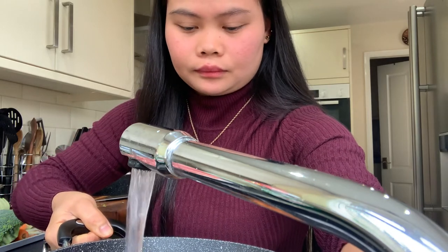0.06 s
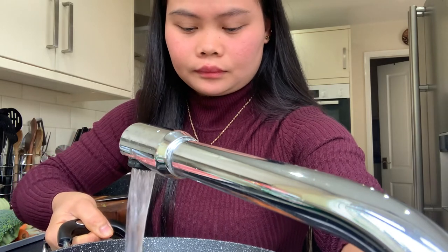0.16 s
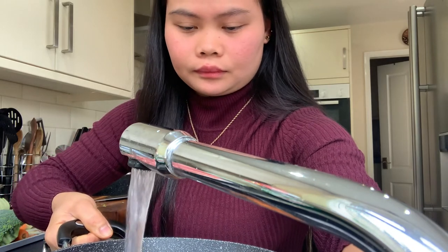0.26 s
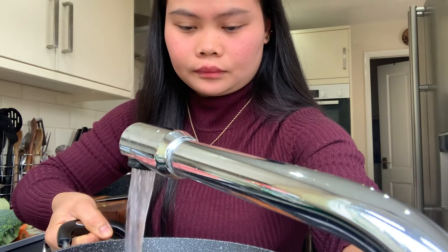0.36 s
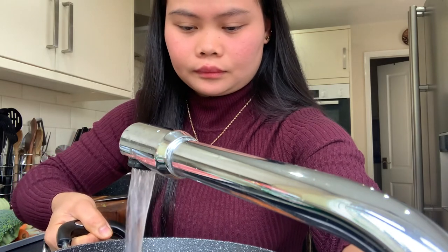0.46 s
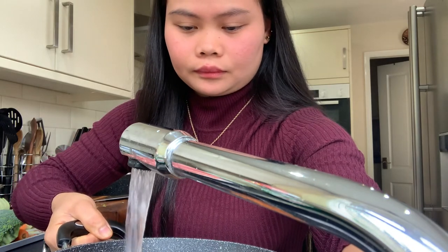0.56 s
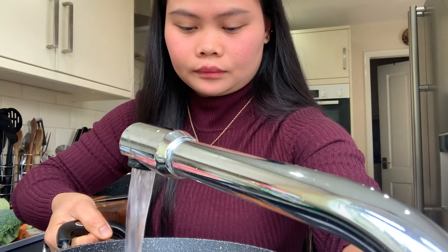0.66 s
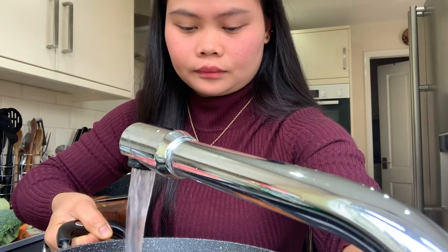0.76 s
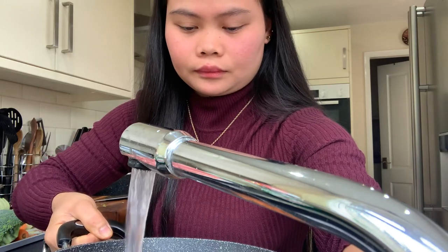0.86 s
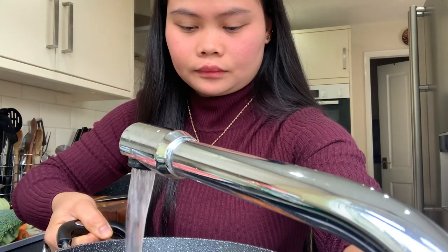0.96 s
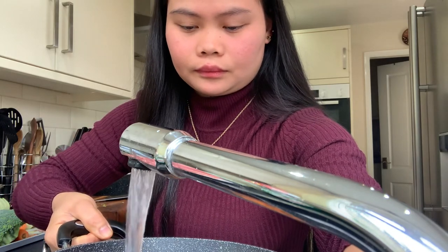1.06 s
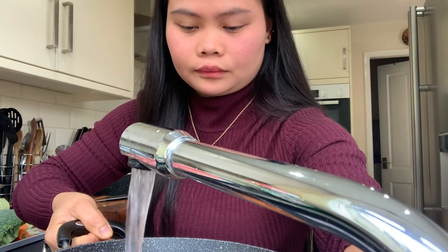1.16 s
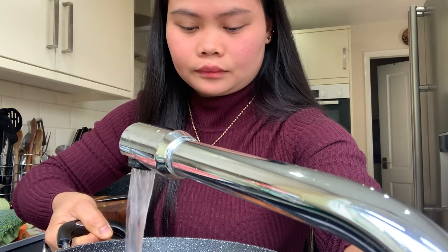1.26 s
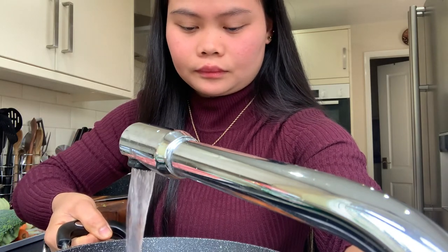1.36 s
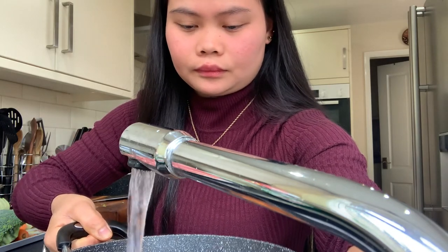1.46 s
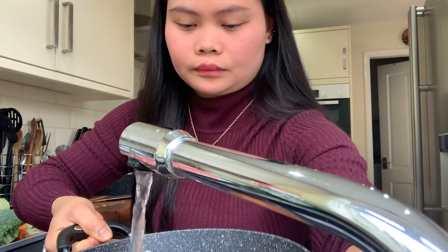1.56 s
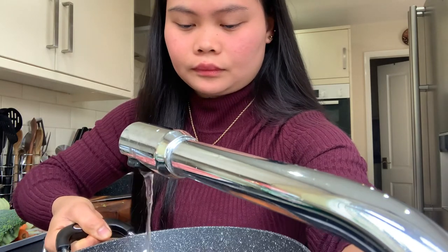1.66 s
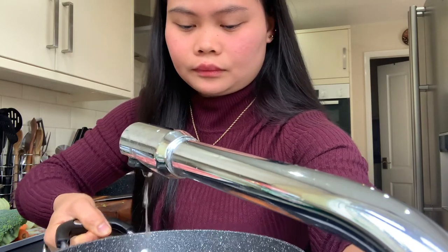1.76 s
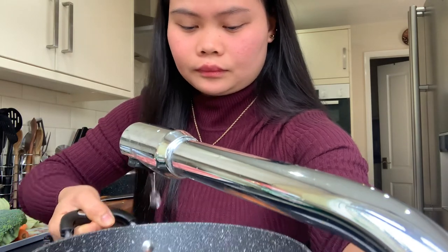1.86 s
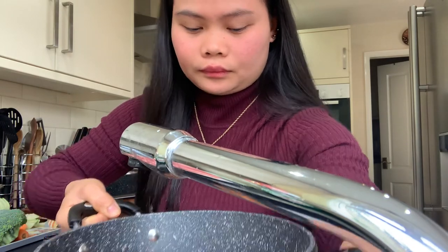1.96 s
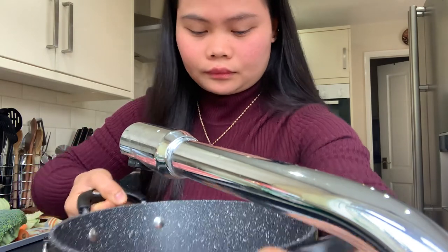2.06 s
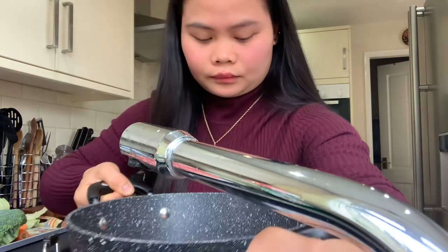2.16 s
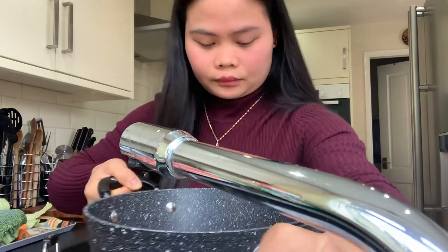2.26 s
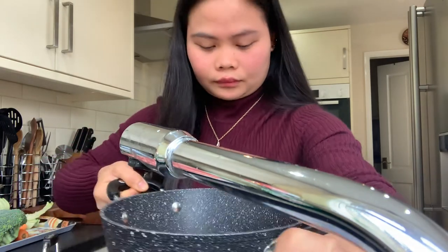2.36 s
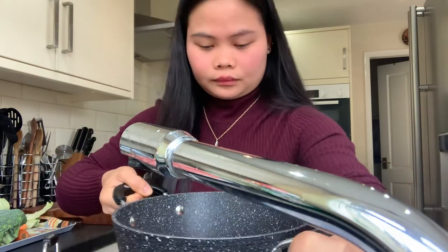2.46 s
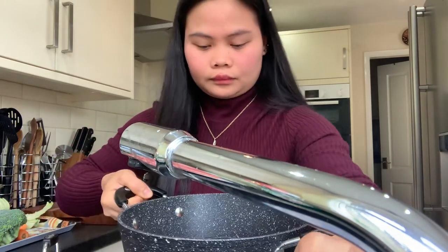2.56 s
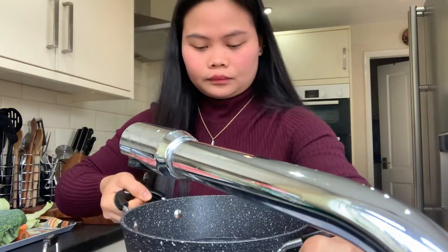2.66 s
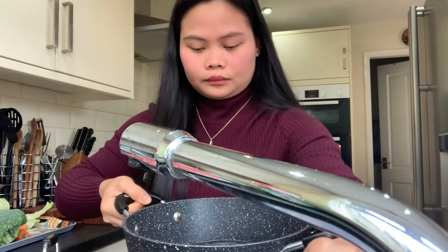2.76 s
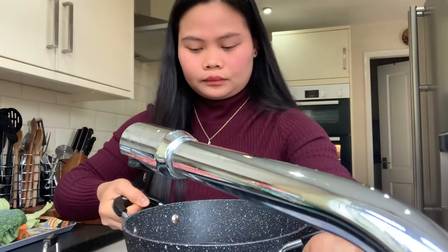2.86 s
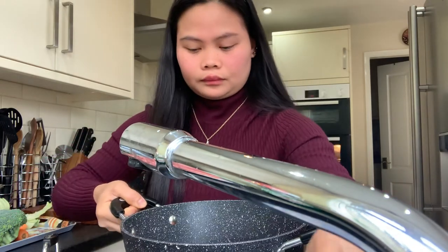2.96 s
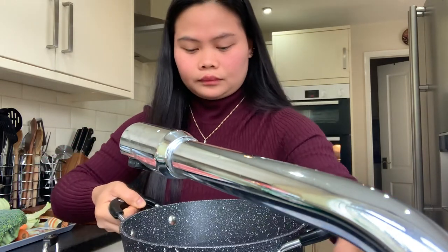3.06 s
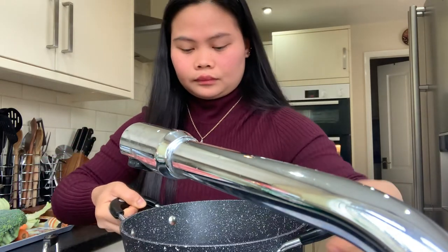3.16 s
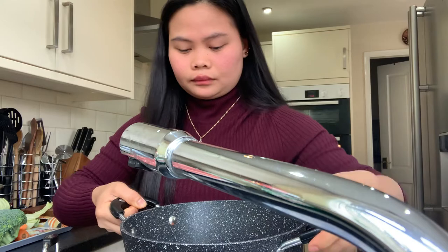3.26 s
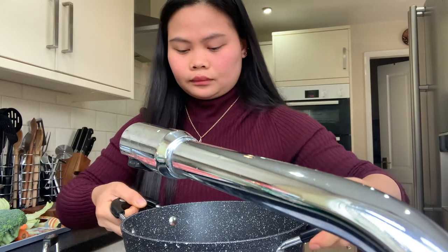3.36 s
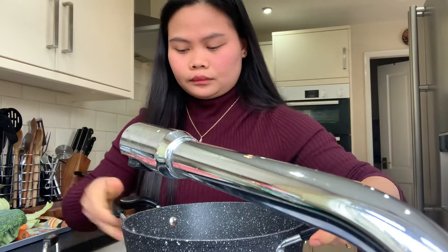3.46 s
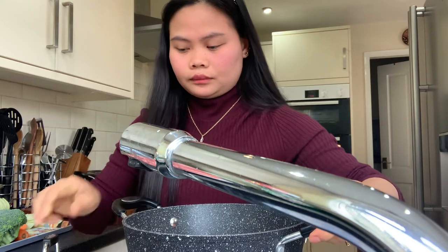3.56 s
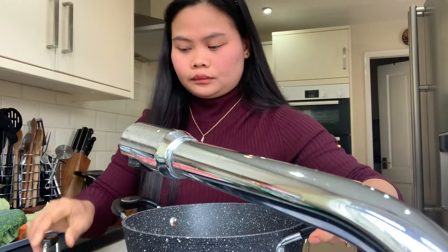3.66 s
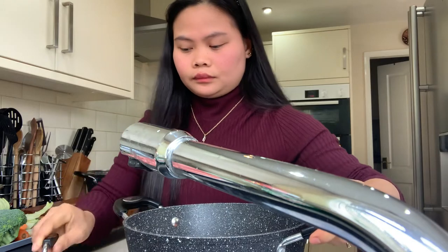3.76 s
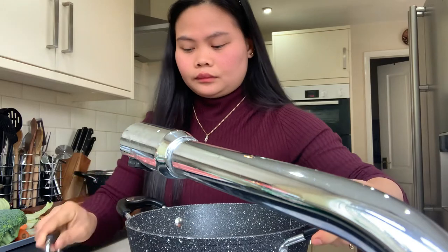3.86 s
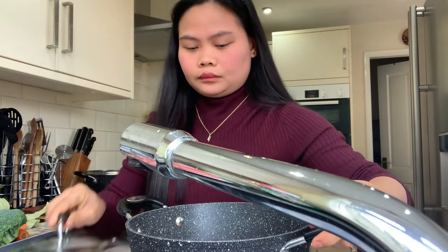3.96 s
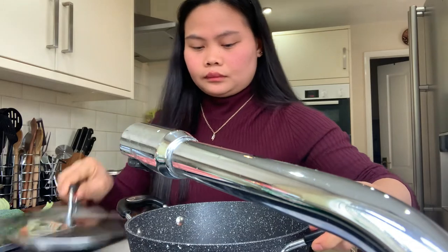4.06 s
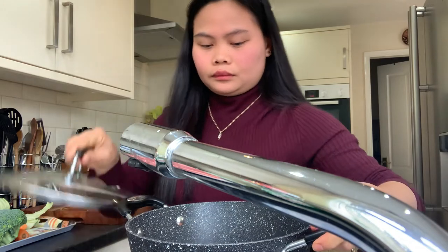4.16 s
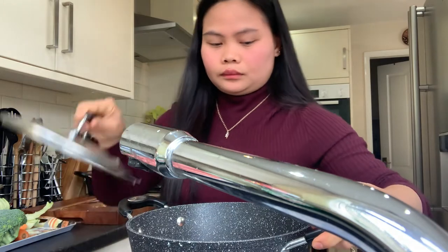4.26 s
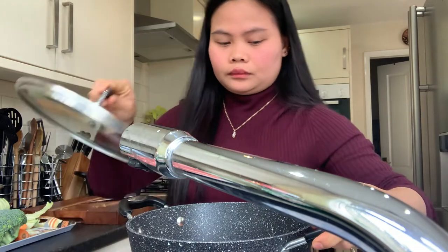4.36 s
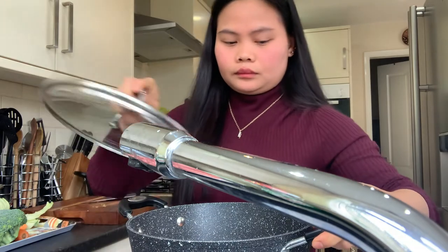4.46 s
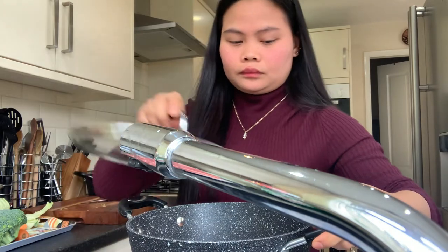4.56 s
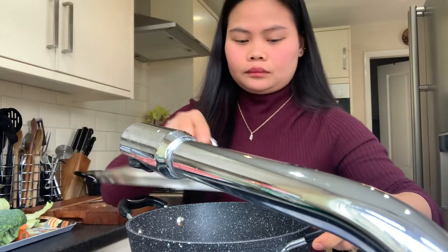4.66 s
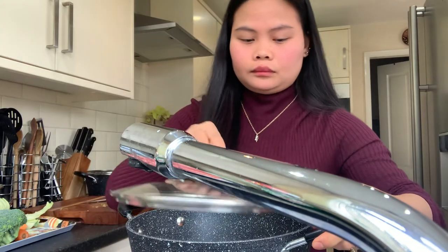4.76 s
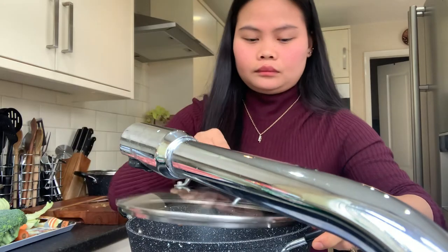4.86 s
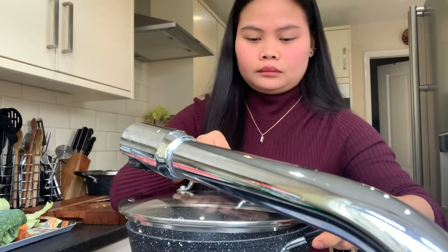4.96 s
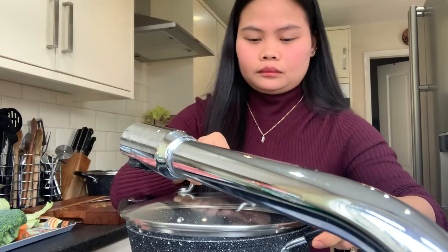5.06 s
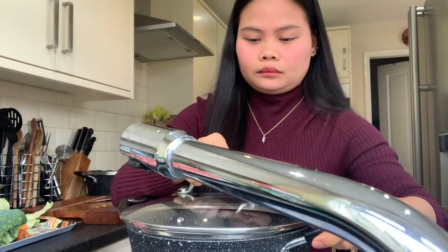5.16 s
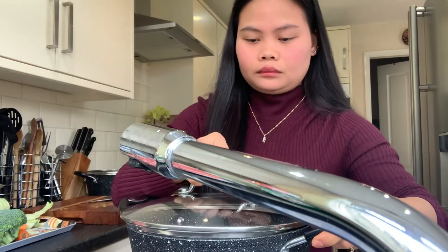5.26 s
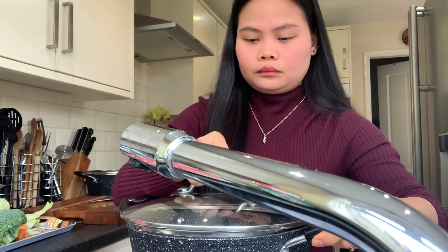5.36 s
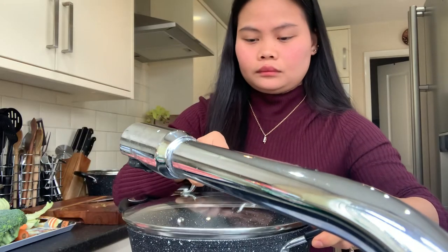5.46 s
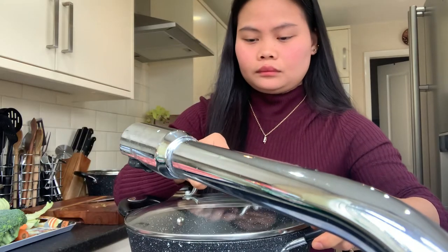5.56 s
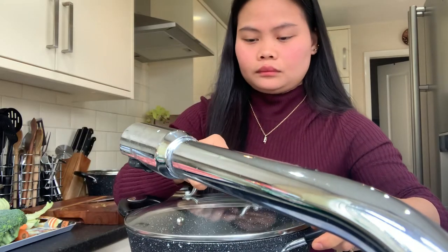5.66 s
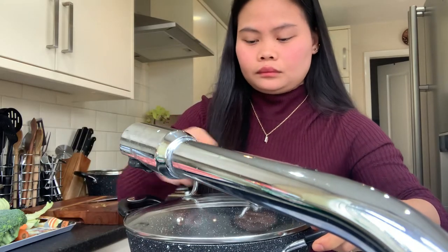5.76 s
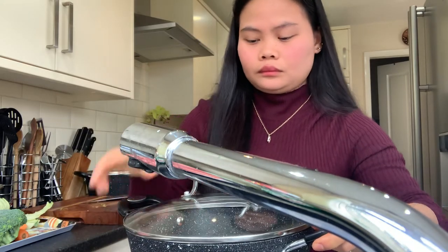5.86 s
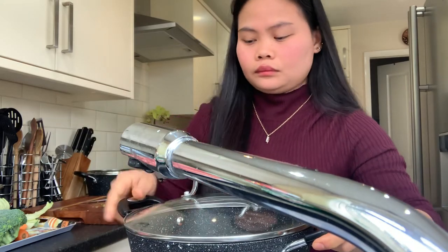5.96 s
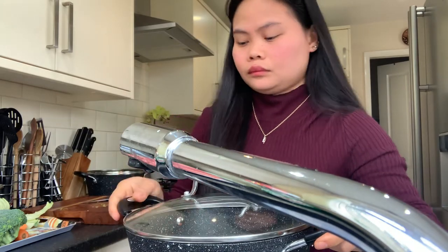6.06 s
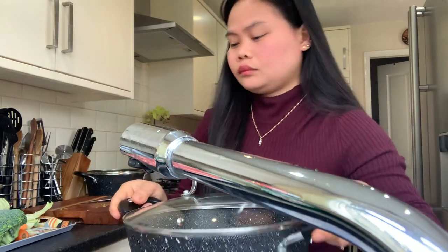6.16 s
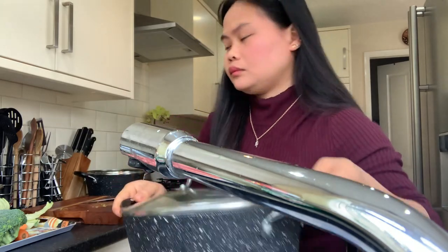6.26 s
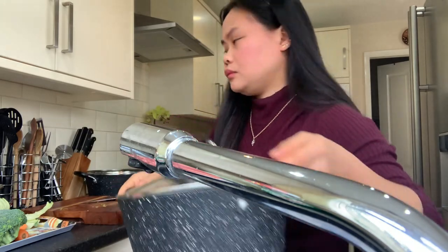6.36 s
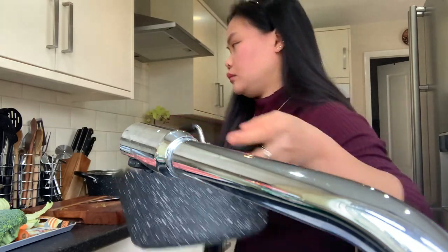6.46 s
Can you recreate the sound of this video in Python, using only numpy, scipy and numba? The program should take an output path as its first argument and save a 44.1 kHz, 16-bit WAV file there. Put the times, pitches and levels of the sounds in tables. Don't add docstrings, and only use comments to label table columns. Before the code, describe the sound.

Close in a tiled kitchen with a faint fridge hum, tap water hisses and bubbles hollowly into a metal pot. It shuts off quickly, leaving plops and drips. The pot thuds onto the worktop and settles, hands rustle softly, a glass lid scrapes and knocks sharply, then clanks onto the rim, slides into its seat, and the covered pot rattles as it is shifted. Stereo phone microphone, short reverberation.

```python
import sys
import numpy as np
from scipy import signal
from scipy.fft import rfft, irfft
from scipy.io import wavfile
from scipy.ndimage import uniform_filter1d
from numba import njit

SR = 44100
rng = np.random.default_rng(int(sys.argv[2]) if len(sys.argv) > 2 else 0)


def magnitude_from_level(level_db):
    exponent = np.asarray(level_db, float) / 20
    return 10 ** exponent


def dump_mix(stems):
    frames = np.atleast_2d(stems).T
    limited = np.clip(frames, -1, 1)
    pcm = np.round(limited * 32767).astype(np.int16)
    wavfile.write(sys.argv[1], SR, pcm)


N = 287527
PORTS = np.array([[1], [-1]])
SHUT_S = 1.516

# (frequency [Hz], density [dB per Hz])
LID_ON_POT_BODY = [(40, -33), (200, -2), (450, 7), (1050, -11.5), (1400, -11), (3000, -14), (6200, -28),
                   (9000, -39.5), (12000, -58), (16000, -62)]


def level(x, db):
    return x * magnitude_from_level(db) / np.sqrt(np.mean(x ** 2))


def on_log(table, hz):
    f, v = np.transpose(table)
    return np.interp(np.log(np.maximum(hz, 1)), np.log(f), v)


def colour(x, table, tilt_db=0.):
    hz = np.fft.rfftfreq(8192, 1 / SR)
    octaves = np.log2(np.maximum(hz, 60) / 1000)
    cepstrum = irfft(np.log(magnitude_from_level(on_log(table, hz) + tilt_db * octaves)))
    cepstrum[1:4096] *= 2
    cepstrum[4097:] = 0
    response = irfft(np.exp(rfft(cepstrum)))[:4096]
    return signal.fftconvolve(np.atleast_2d(x), response[None], axes=1)[:, :x.shape[-1]]


def stereo_noise(size, alike_hz=250):
    mid, side = rng.standard_normal((2, size))
    return mid + PORTS * signal.lfilter(*signal.butter(1, alike_hz, "high", fs=SR), side)


def walk(rate):
    k = int(SR / rate)
    steps = np.repeat(rng.standard_normal(N // k + 1), k)
    return 1.6 * uniform_filter1d(uniform_filter1d(steps, k), k)[:N]


def band_pass(x, order, low_hz, high_hz):
    return signal.sosfilt(signal.butter(order, [low_hz, high_hz], "band", fs=SR, output="sos"), x)


def resonate(x, hz, width_hz):
    return signal.lfilter(*signal.iirpeak(hz, hz / width_hz, fs=SR), x)


def kitchen():
    # (frequency [Hz], density [dB per Hz])
    floor = [(15, -60.5), (30, -11), (52, -8.5), (80, -1.5), (130, -11.5), (340, -10), (700, -24.5),
             (950, -19), (1200, -26), (2000, -34), (2800, -70.5), (6400, -90), (9000, -55), (16000, -64.5)]
    # (frequency [Hz], width [Hz], rms level [dB])
    motor = [(97.8, 3.4, -51.5), (200, 3.9, -57), (324.4, 3.3, -62)]
    air = level(colour(stereo_noise(N, 380), floor), -50.5) * magnitude_from_level(0.28 * walk(0.8))
    hum = sum(level(resonate(rng.standard_normal(N), f, w), db) for f, w, db in motor)
    return air + hum * magnitude_from_level(PORTS * 1.0)


def flow():
    t = np.arange(N) / SR
    after = np.maximum(t - SHUT_S, 0)
    shutting_db = -193 * after
    trickle_db = -63 - 20.5 * after
    slosh_db = -55 - 159 * np.maximum(t - 1.827, 0)
    jet = magnitude_from_level(-41 + shutting_db)
    trickle = magnitude_from_level(trickle_db + 3 * walk(30))
    gurgling = magnitude_from_level(-45 + shutting_db) + magnitude_from_level(trickle_db + 2.5) + magnitude_from_level(slosh_db)
    return jet, trickle, gurgling


@njit
def bubbles(start, hz, cycles, size, glide, n):
    y = np.zeros(n)
    for k in range(len(start)):
        w = 2 * np.pi * hz[k] / SR
        length = int(cycles[k] * SR / hz[k])
        phase, a, fade = 0., size[k], np.exp(-5.5 / length)
        for i in range(start[k], min(start[k] + length, n)):
            phase += w
            w *= 1 + glide / length
            a *= fade
            attack = min(16 * (i - start[k]) / length, 1.)
            y[i] += a * attack * np.sin(phase)
    return y


def gurgle():
    # (frequency [Hz], width [Hz], level [dB])
    pot_resonances = [(473, 19, -6.5), (634, 18.5, -4.5), (867, 87, -10), (1064, 39, -6), (1213, 25, -6),
                      (1684, 110, -13.5), (2320, 22, -17), (2770, 83, -17), (2940, 32, -13.5)]
    swarm = []
    for port in range(2):
        when, pitch, strength, life = rng.random((8000, 4)).T
        hz = 250 * (6000 / 250) ** pitch
        power = sum(magnitude_from_level(2 * db) / (1 + ((hz - f) / w * 2) ** 2) for f, w, db in pot_resonances)
        gain_db = 10 * np.log10(power + 0.0065)
        size = magnitude_from_level(gain_db - 2.0 * np.log(strength)) * np.sqrt(hz / 1000)
        start = (when * 2.8 * SR).astype(np.int64)
        swarm.append(bubbles(start, hz, 13.0 + 20. * life, size, 0.061, N))
    surge_db = .4 * walk(14)
    return level(np.array(swarm), 0.6) * magnitude_from_level(surge_db)


def floor_drumming():
    # (frequency [Hz], density [dB per Hz])
    drum_spectrum = [(20, -24), (45, -2), (90, 0), (170, -1), (300, -10.5), (600, -25.5)]
    return level(colour(stereo_noise(N), drum_spectrum), -3.5)


def patchy(x):
    edges = 1597 * 2 ** np.arange(0, 3, .5)
    bands = [band_pass(x, 1, f, f * np.sqrt(2)) for f in edges]
    return x + sum(band * (magnitude_from_level(1.54 * walk(31)) - 1) for band in bands)


def spray(jet, trickle):
    # (frequency [Hz], density [dB per Hz])
    hiss_spectrum = [(100, -32.5), (300, -20.5), (600, -7.5), (1300, -10.5), (2400, -0.5), (4000, -5),
                     (6200, -8), (7500, -7.5), (8700, 3.5), (10500, -1), (13500, -4.5), (15600, -1.5),
                     (16200, -41)]
    # (frequency [Hz], width [Hz], level [dB])
    basin = [(1680, 80, -1.5), (2357, 34, -9), (6170, 110, -4.5), (6450, 69, -5), (10230, 260, -7.5),
             (11170, 73, -8), (11800, 140, -9.5), (12800, 54, -4), (13410, 220, -4.5), (14200, 190, -6),
             (14600, 187, -1), (15000, 150, -2), (15080, 69, -5.5), (15460, 56, -11)]
    # (frequency [Hz], gain [dB])
    thin_stream = [(1500, -2), (4000, 6.5), (7000, 6.5), (11000, -2.5), (16000, -5.5)]
    hiss = colour(rng.standard_normal((2, N)), hiss_spectrum)
    hiss = hiss + 2.7 * sum(magnitude_from_level(db / 2) * resonate(hiss, f, w) for f, w, db in basin)
    hiss = level(patchy(hiss), 6.2) * magnitude_from_level(1.3 * walk(50))
    return hiss * jet + colour(hiss, thin_stream) * trickle


def pops():
    # (time [s], peak level [dB], pitch [Hz])
    lone_bubbles = [(0.045, -27, 1135), (0.129, -37, 660), (.289, -32, 1170), (0.55, -37, 620),
                    (1, -36, 440), (0.97, -30, 880), (0.84, -41, 830), (1.3, -43, 1200), (1.4, -43, 624),
                    (0.5, -33, 1000), (.573, -26, 490), (.578, -32, 717), (0.38, -31, 650),
                    (0.22, -34, 1720), (0.34, -38, 930), (.7, -37, 660), (1.1, -22, 1110), (0.89, -40, 640),
                    (1.1, -32, 630), (.853, -33, 1010), (.872, -34, 1210), (0.77, -38, 1400),
                    (1.148, -33, 450), (1.435, -33.5, 750), (1.462, -33, 1090), (0.82, -32, 1900),
                    (0.85, -30, 2350), (1.26, -42, 1750), (.272, -34, 1100), (1.191, -30, 427)]
    # (time [s], peak level [dB], pitch [Hz], splash level [dB])
    drips = [(1.663, -64, 1170, -48), (1.688, -35.5, 624, -69), (1.693, -37.5, 2100, -64),
             (1.737, -33.5, 700, -52), (1.773, -37.5, 257, -62), (1.774, -27, 1180, -46.5),
             (1.78, -34, 780, -61), (1.803, -35, 1213, -65), (1.816, -46, 1250, -52),
             (1.852, -31, 595, -49.5), (1.93, -53, 536, -56), (1.715, -53, 900, -72),
             (1.738, -34, 160, -68), (1.752, -35, 336, -66), (1.782, -28, 117, -70), (1.791, -38, 430, -70),
             (1.818, -44, 4300, -60), (1.77, -40, 6500, -60), (2.035, -56, 3800, -63),
             (2.1, -52, 1250, -68), (2.125, -56, 1400, -70), (2.15, -56, 1100, -70),
             (1.648, -43, 1610, -67), (1.88, -45, 1150, -68), (1.836, -47, 300, -70),
             (1.859, -42, 140, -74)]
    # (frequency [Hz], density [dB per Hz])
    splash_spectrum = [(300, 10.5), (1200, -1), (2500, -2), (4500, -4.5), (6200, 0), (7500, -6),
                       (10000, -14), (15500, -10), (16200, -51)]
    s, db, hz = np.transpose(lone_bubbles + [row[:3] for row in drips])
    air_ring_s = 0.026 / (1 + ((hz - 1200) / 41) ** 2) * (s > SHUT_S)
    ring_s = np.minimum(0.029, 26 / hz) + air_ring_s
    tones = bubbles((s * SR).astype(np.int64), hz, ring_s * hz, magnitude_from_level(db + 4.0), 0.028, N)
    clicks = np.zeros(N)
    clicks[[int(row[0] * SR) for row in drips]] = magnitude_from_level(np.array(drips)[:, 3] + 10.5)
    fade = signal.lfilter([1], [1, -np.exp(-1 / (0.0056 * SR))], clicks)
    noise = level(colour(rng.standard_normal((2, N)), splash_spectrum), 0)
    return tones + noise * uniform_filter1d(fade, size=160)


def water():
    jet, trickle, gurgling = flow()
    return (gurgle() + floor_drumming()) * gurgling + spray(jet, trickle) + pops()


def ringing(modes, t, tilt_db, damping, rise_s):
    hz, width, db = np.transpose(modes)[:, :, None]
    width = np.clip(damping * width, 9, 400)
    chance = rng.standard_normal((4,) + hz.shape)
    scatter_db = 1.2 * chance[0]
    strength = width * magnitude_from_level(db + tilt_db * np.log2(hz / 1000) + scatter_db)
    decay = strength * np.exp(-np.pi * width * t)
    beat = 1 + 0.2 * np.cos(2 * np.pi * 0.0058 * hz * (1 + 0.45 * chance[1]) * t)
    start = np.minimum(hz / 300, 3) * chance[3]
    shift = np.pi / 2 * np.minimum(hz / 750, 1) * np.sign(chance[2] + 0.99)
    rise = 1 - np.exp(-(t / rise_s * np.clip(hz / 700, 1, 4)) ** 2)
    envelope = rise * decay * beat
    ring = np.array([np.sum(envelope * np.sin(2 * np.pi * hz * t + phase), axis=0)
                     for phase in (start - shift, start)])
    return ring / np.abs(ring).max()


def knocks(events, modes, body, ring_db, damping, tilt_db, rattle_s, crack_db):
    # (frequency [Hz], width [Hz], level [dB])
    worktop = [(54, 14.5, 3.5), (90, 24, -3.5), (140, 31, 2)]
    out, t = np.zeros((2, 2, N + SR)), np.arange(SR // 2) / SR
    fade = np.exp(-t / np.clip(rattle_s, .001, .1)) * (1 - np.exp(-t / 0.0017))
    for s, peak_db, thump_db, hard_db in events:
        shake = colour(stereo_noise(len(t)) * fade, body, tilt_db + hard_db)
        crack = np.diff(rng.standard_normal(len(t) + 1)) * np.exp(-t / 0.00087)
        crack = magnitude_from_level(crack_db + 6.2 * hard_db) * crack
        ring = magnitude_from_level(ring_db) * ringing(modes, t, tilt_db + hard_db, damping, rise_s=0.0042)
        thump = magnitude_from_level(thump_db) * ringing(worktop, t, 0, 0.9, rise_s=0.0038)
        i, gain = int(s * SR), magnitude_from_level(peak_db + PORTS * 0.35)
        out[0, :, i:i + len(t)] += (shake / np.abs(shake).max() + ring + thump) * gain
        out[1, :, i:i + len(t)] += crack * gain
    return out[..., :N]


def pot_lands():
    # (time [s], peak level [dB], relative worktop thump [dB], hardness [dB per octave])
    landing = [
        (2.820, -14, -34, 3),
        (2.823, -7.5, -5, -1.5),
        (2.833, -11.5, -21, -0.5),
        (2.848, -18, -17, 1),
        (2.868, -26, -12, 1.5),
        (2.889, -21.5, -8, 0.5),
    ]
    settling = [
        (3.008, -24, -24, 9.5),
        (3.009, -12, -17, -2),
        (3.022, -11.5, -6.5, 0),
        (3.030, -31, -15, 3),
    ]
    # (frequency [Hz], width [Hz], level [dB])
    landing_modes = [(203, 36, -6), (269, 26, -13), (352, 15, -12), (590, 9.7, -14), (706, 11, -15.5),
                     (895, 22, -8), (1100, 10, -12), (1300, 43, -12), (1518, 27, -15.5), (1697, 88, -12.5),
                     (2260, 82, -25), (2750, 90, -25)]
    settling_modes = [(147, 19, -9.5), (300, 34, -19), (434, 25, 0.5), (560, 66, -15), (682, 100, 2.5),
                      (830, 85, -7), (998, 24, -8), (1180, 32, -13)]
    # (frequency [Hz], density [dB per Hz])
    pot_body = [(40, -18.5), (200, 8), (500, -10), (1100, -15.5), (2700, -23), (6000, -38.5), (9000, -54),
                (12000, -59), (16000, -74)]
    return (knocks(landing, landing_modes, pot_body, ring_db=-0.5, damping=1.9, tilt_db=-0.8,
                   rattle_s=0.009, crack_db=-48)
            + knocks(settling, settling_modes, pot_body, ring_db=0.0, damping=1.57, tilt_db=-2.03,
                     rattle_s=0.0085, crack_db=-69.0))


def rubbing():
    # (start [s], swell [s], hold [s], rustle level
    # [dB], slide level [dB])
    rubs = [(3.282, 0.12, 0.063, -68.5, -56.5), (3.716, 0.13, 0.02, -65, -42),
            (3.854, 0.022, .001, -30.5, -50), (4.133, 0.024, 0.0012, -19.5, -43),
            (5.065, 0.031, 0.023, -84, -38), (5.419, 0.027, 0.046, -67, -37),
            (5.512, 0.025, 0.032, -73, -47), (6.0, 0.16, 0.15, -79, -68)]
    # (frequency [Hz], density [dB per Hz])
    rustle_spectrum = [(150, -1.5), (500, 9.5), (1500, 9.5), (4000, 9), (7000, -0.5), (15000, -24.5)]
    slide_spectrum = [(120, -6.5), (270, 8.5), (600, -2), (1000, -12.5), (1400, -28.5), (1600, -25.5),
                      (1900, -23), (4000, -53.5)]
    # (frequency [Hz], width [Hz], level [dB])
    song_modes = [(270, 50, 1), (480, 90, -11), (1010, 80, -21), (1580, 70, -24), (2450, 300, -28),
                  (3200, 350, -30)]
    t, rustle, slide = np.arange(N) / SR, 0, 0
    for s, swell_s, hold_s, rustle_db, slide_db in rubs:
        short = np.clip(1 - (t - s) / swell_s, 0, 2)
        released_s = np.maximum(t - s - swell_s - hold_s, 0)
        shape = magnitude_from_level(-40 * short ** 2 - 602 * released_s)
        rustle = rustle + magnitude_from_level(rustle_db) * shape
        slide = slide + magnitude_from_level(slide_db) * shape
    grains = stereo_noise(N) * magnitude_from_level(2.0 * walk(120))
    song = sum(magnitude_from_level(db) * level(band_pass(grains, 2, f - w / 2, f + w / 2), 0) for f, w, db in song_modes)
    dry_rub = level(colour(grains, rustle_spectrum), 3.5)
    rim_rub = level(colour(grains, slide_spectrum), 0.0) + magnitude_from_level(-4.0) * song
    return dry_rub * rustle + rim_rub * slide


def finger_ticks():
    # (time [s], peak level [dB], relative worktop thump [dB], hardness [dB per octave])
    handle = [
        (3.31, -37.5, -44.5, 0.0063),
        (3.429, -58, -45, 1),
    ]
    knob = [
        (5.437, -63, -21, -4),
        (5.539, -35, -22, 0.005),
    ]
    # (frequency [Hz], width [Hz], level [dB])
    handle_modes = [(1250, 90, 1), (2260, 30, 4), (2880, 22, -12), (3260, 60, -18), (4450, 40, -21)]
    knob_modes = [(2285, 22, -1), (2900, 30, -19), (3180, 25, -12), (4520, 40, -24)]
    # (frequency [Hz], density [dB per Hz])
    tick_body = [(700, -16), (1300, 3), (2300, -5), (4000, -6.5), (8000, -14), (16000, -22)]
    return (knocks(handle, handle_modes, tick_body, ring_db=4.0, damping=1.7, tilt_db=-1.3,
                   rattle_s=0.0059, crack_db=-22)
            + knocks(knob, knob_modes, tick_body, ring_db=-0.5, damping=0.47, tilt_db=5.5,
                     rattle_s=0.016, crack_db=-22))


def lid_picked_up():
    # (time [s], peak level [dB], relative worktop thump [dB], hardness [dB per octave])
    drag = [(3.871, -8, -20, -1), (3.878, -9, -25, -1), (3.894, -16.5, -23.5, -3.5), (3.906, -16, -26, 0.5),
            (3.912, -9, -27.5, -3.5), (3.921, -13.5, -20.5, -0.5), (3.930, -16, -25, 0.5),
            (3.938, -18, -29, -2), (3.945, -15, -16, -2.5), (3.950, -26.5, -20.5, 0.5)]
    pick_up = [
        (4.152, 3.5, -21.5, 1.5),
        (4.160, -3, -6.5, -1),
        (4.169, 0.5, -7.5, -5.5),
        (4.179, -11, -17, 1.5),
        (4.191, -16.5, -15, -0.5),
    ]
    # (frequency [Hz], width [Hz], level [dB])
    drag_modes = [(205, 60, -5), (240, 40, -10), (420, 20, -7), (560, 45, 1.5), (635, 30, 4.5),
                  (705, 35, 1.5), (780, 80, -10), (972, 30, -6), (1032, 24, 1), (1288, 36, -7),
                  (1750, 45, -13), (1906, 30, -14), (2400, 40, -15), (2607, 34, -6), (3408, 38, -9),
                  (3470, 30, -13), (3690, 30, -18), (4000, 30, -13), (4285, 34, -16), (4370, 36, -18),
                  (4990, 30, -26), (5380, 45, -18), (5454, 30, -10), (6331, 40, -20), (6901, 40, -27),
                  (7610, 52, -25)]
    lid_modes = [(245, 50, -9), (320, 60, -4), (414, 17, -3), (583, 60, -9), (688, 30, 0.5), (866, 60, -15),
                 (1056, 26, 0.5), (1172, 45, 0), (1260, 50, -12), (1480, 30, -22), (1863, 30, -11),
                 (1944, 30, -5), (2286, 22, -2), (2470, 44, -1), (2560, 50, -6), (2780, 50, -13),
                 (3117, 22, -9), (3480, 50, -13), (3745, 34, -8), (3820, 40, -12), (4231, 30, -9),
                 (4340, 40, -12), (4424, 30, -12), (4760, 40, -27), (5348, 30, -15), (5465, 32, -20),
                 (6158, 70, -25), (6800, 40, -30), (7047, 28, -19), (7564, 30, -27)]
    rim_modes = [(11000, 36, -2.5), (11150, 40, 2.5), (11600, 38.4, -1.5), (11470, 45, -8),
                 (12100, 45, -7.5), (12210, 45, -6.5), (13000, 40, 1.5), (13100, 45, -2), (13750, 45, -5.5),
                 (14300, 38, -4), (14400, 45, -3), (15300, 60, -13)]
    # (frequency [Hz], density [dB per Hz])
    lid_body = [(40, -26.5), (300, 0.5), (700, -8.5), (1200, -4.5), (1500, -13.5), (2500, -10), (4200, -21),
                (4900, -32.5), (7000, -29), (9000, -40.5), (12000, -62), (16000, -69)]
    rim = [(hz, width, db - 39.5) for hz, width, db in rim_modes]
    return (knocks(drag, drag_modes + rim, lid_body, ring_db=5.0, damping=0.85, tilt_db=2.7,
                   rattle_s=0.0037, crack_db=-41)
            + knocks(pick_up, lid_modes + rim, lid_body, ring_db=1.5, damping=0.75, tilt_db=2.07,
                     rattle_s=0.002, crack_db=-42.5))


def lid_clanks():
    # (time [s], peak level [dB], relative worktop thump [dB], hardness [dB per octave])
    clanks = [
        (4.888, -13, -31.5, 1.64),
        (4.896, -17, -6.5, -1.1),
        (4.907, -20, -5, -1),
        (4.919, -23, 1, 0.059),
        (4.955, -30.5, -16, 0.71),
    ]
    # (frequency [Hz], width [Hz], level [dB])
    closed_modes = [(166, 16, -3), (355, 30, -7), (443, 15, 1), (530, 50, -8), (759, 37, -6), (872, 30, -8),
                    (1034, 36, 0), (1200, 35, -7), (1593, 20, -20), (1500, 100, -16), (1825, 30, -25),
                    (2218, 30, -14), (2500, 40, -24), (3117, 25, -27), (3700, 100, -27), (4221, 80, -34),
                    (4834, 65, -40), (6255, 90, -30)]
    return knocks(clanks, closed_modes, LID_ON_POT_BODY, ring_db=6.0, damping=1.0, tilt_db=-0.9,
                  rattle_s=0.019, crack_db=-59.5)


def lid_seats():
    # (time [s], peak level [dB], relative worktop thump [dB], hardness [dB per octave])
    seating = [
        (5.119, -25, -30, 6.5),
        (5.123, -9.5, -24, -2),
        (5.135, -17, -4.5, 3),
        (5.15, -24, -27, 2.5),
        (5.17, -19, -5, 2.5),
    ]
    # (frequency [Hz], width [Hz], level [dB])
    seated_modes = [(225, 160, 11), (285, 24, -6), (340, 36, -8), (452, 30, -11), (662, 28, -3),
                    (993, 14, -1), (1233, 30, -12), (1610, 60, -9), (1841, 34, -13), (2089, 15, -15),
                    (2340, 50, -14), (3133, 40, -28), (3688, 40, -26), (4016, 40, -30), (4355, 40, -32)]
    # (frequency [Hz], density [dB per Hz])
    seated_body = [(40, -34.5), (250, 9.5), (650, 4), (1050, -1), (1400, -15.5), (2100, -14), (4000, -24),
                   (7000, -34.5), (9000, -45.5), (12000, -44), (16000, -57)]
    return knocks(seating, seated_modes, seated_body, ring_db=2.0, damping=0.8, tilt_db=-0.5,
                  rattle_s=0.014, crack_db=-51)


def pot_lifts():
    # (time [s], peak level [dB], relative worktop thump [dB], hardness [dB per octave])
    lifting = [(5.544, -28.5, -12, 1), (5.55, -26.5, 4, -8.5), (5.601, -25, -20, 3.5),
               (5.605, -14.5, -17, 1), (5.624, -23, -0.5, -3), (5.638, -24.5, -13, 0),
               (5.655, -27, -4, 0.5), (5.742, -36.5, 11.5, -1)]
    # (frequency [Hz], width [Hz], level [dB])
    lifted_modes = [(209, 55, 1.5), (440.5, 18, -9.5), (546.4, 21.5, -4), (700, 66, -36.5), (890, 18, -2.5),
                    (1082, 134, 0), (1495, 23, -12.5), (1880, 40, -27), (2170, 25, -23), (2484, 50, -18),
                    (2783, 43, -23), (3100, 44, -27), (3370, 30, -30), (3630, 50, -25), (4382, 15, -35)]
    return knocks(lifting, lifted_modes, LID_ON_POT_BODY, ring_db=7.0, damping=0.94, tilt_db=-1.7,
                  rattle_s=0.026, crack_db=-39)


def room(x, wet_db):
    # (frequency [Hz], reverberation time T60 [s])
    decay_times = [(60, 0.782), (250, 0.47), (1000, 0.44), (4000, 0.4), (12000, 0.24)]
    t = np.arange(int(.8 * SR)) / SR
    centres = 45 * 2 ** np.arange(0, 8.5, .5)
    noise = stereo_noise(len(t), 240)
    tail = sum(band_pass(noise, 2, f / 1.063, f * 1.244) * magnitude_from_level(-60 * t / on_log(decay_times, f))
               for f in centres)
    tail = tail * (1 - np.exp(-(t / 0.0015) ** 2))
    tail = tail / np.sqrt(np.sum(tail ** 2) / 2)
    return x + magnitude_from_level(wet_db) * signal.fftconvolve(x, tail, axes=1)[:, :N]


def scene():
    bodies, cracks = (pot_lands() + finger_ticks() + lid_picked_up()
                      + lid_clanks() + lid_seats() + pot_lifts())
    impacts = (room(bodies, -8.5) + cracks) * magnitude_from_level(-4)
    return impacts + room(water() + rubbing(), -7.0) + kitchen()


def roll_off(x):
    return signal.sosfilt(signal.butter(12, 16460, fs=SR, output="sos"), x)


def record(dry):
    # (frequency [Hz], gain [dB])
    port_sum = [(6500, -0.29), (7300, -2.5), (8000, -4.5), (8700, -17), (10000, -21), (10400, -3),
                (12500, -3.5), (15650, 2), (15950, -45.5)]
    port_difference = [(50, 5.5), (90, 1), (180, -3.5), (350, 2.1), (700, 2.7), (1400, -0.5), (2800, 0),
                       (6000, 0), (8500, 4.5), (11800, -3), (12600, -17.5), (14000, -35.5)]
    # (frequency [Hz], level difference [dB])
    port_balance = [(40, 0), (90, 1.8), (350, 1.5), (700, -1.6), (1400, -0.9), (2800, -1), (6000, -0.5),
                    (9000, 0.4)]
    hz = np.fft.rfftfreq(N, 1 / SR)
    dry = np.tanh(0.96 * dry) / 1.105
    mid = irfft(rfft(dry[0] + dry[1]) * magnitude_from_level(on_log(port_sum, hz)), N) / 2
    side = irfft(rfft(dry[0] - dry[1]) * magnitude_from_level(on_log(port_difference, hz)), N) / 2
    lean_db = PORTS * on_log(port_balance, hz) / 2
    both = irfft(rfft(mid + PORTS * side) * magnitude_from_level(lean_db), N)
    wide = signal.sosfilt(signal.butter(3, 33, "high", fs=SR, output="sos"), both)
    return roll_off(wide)


dry = scene()
out = record(dry)
dump_mix(out)
```